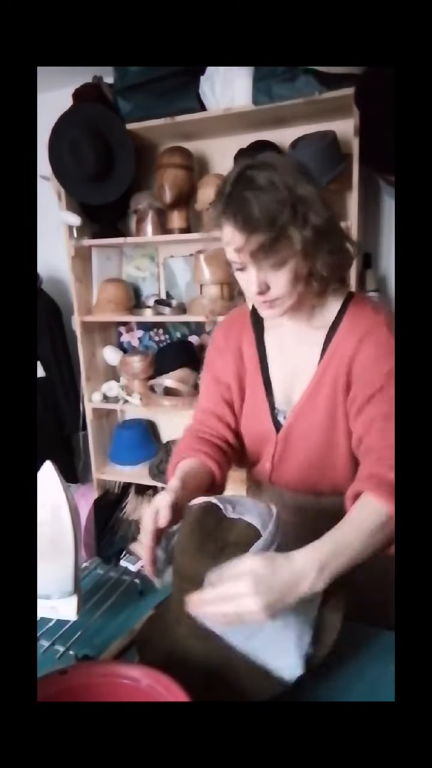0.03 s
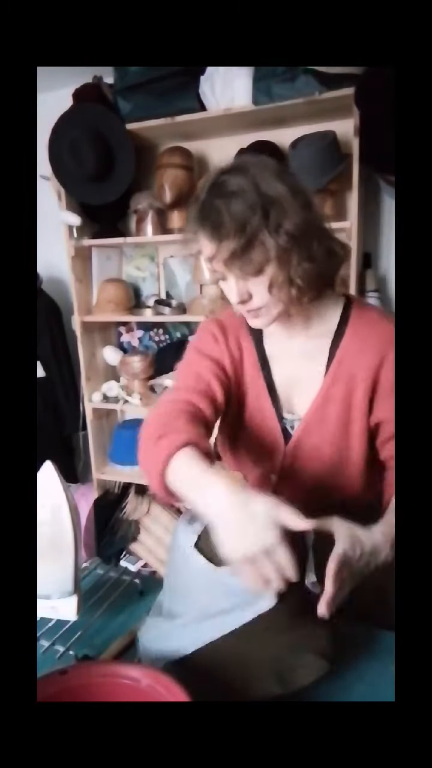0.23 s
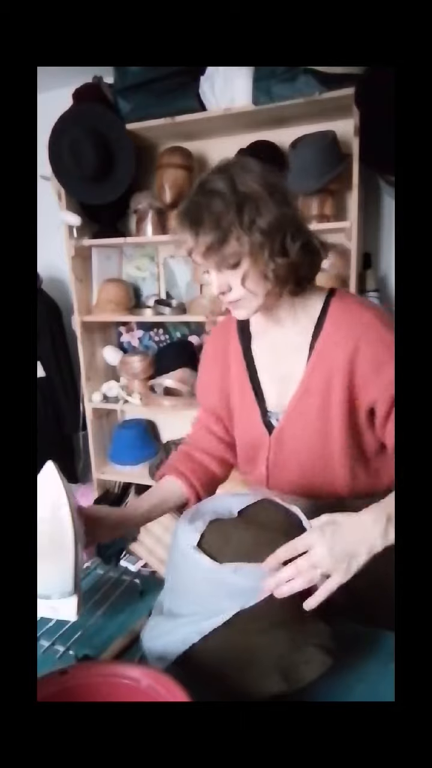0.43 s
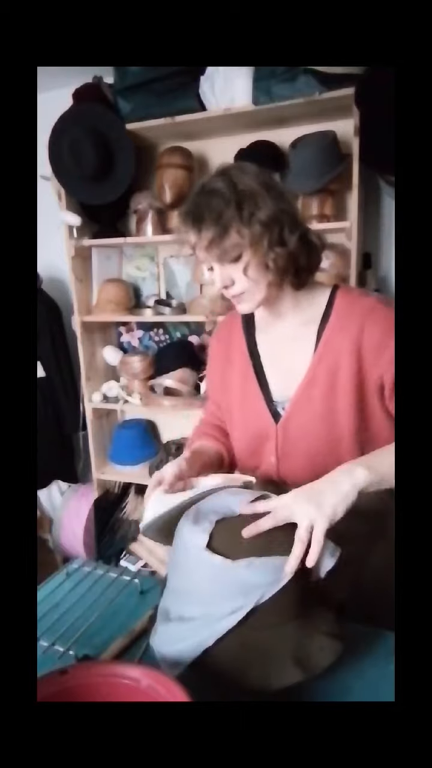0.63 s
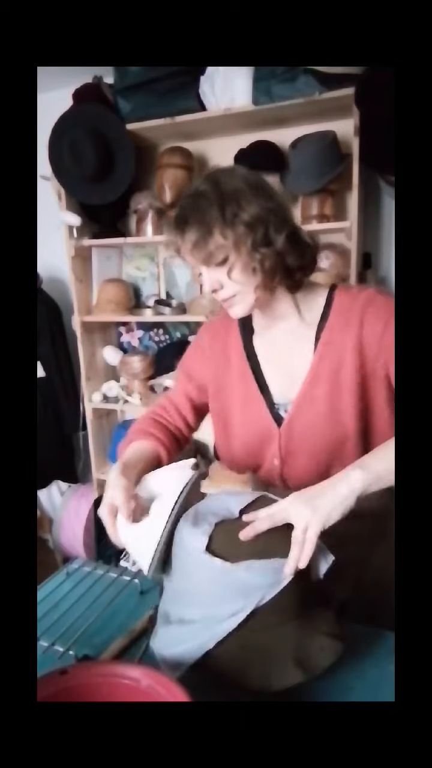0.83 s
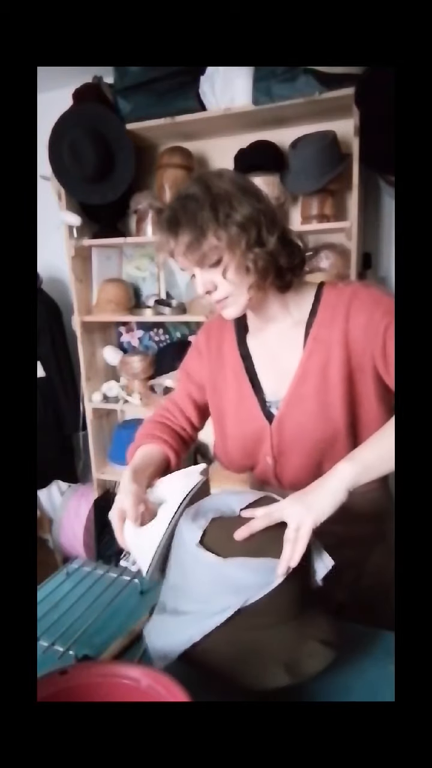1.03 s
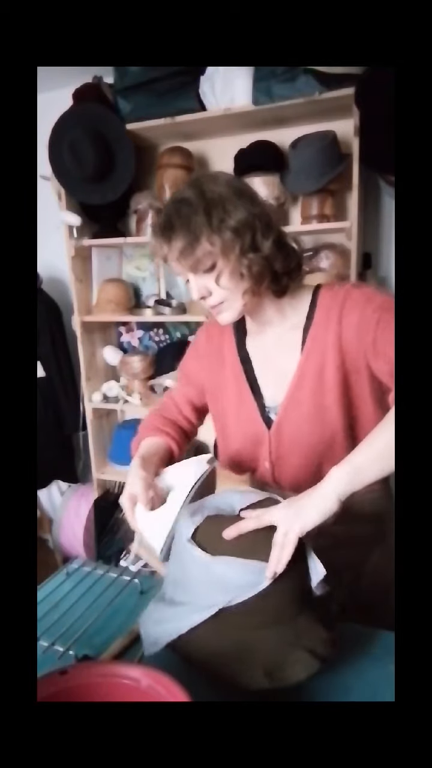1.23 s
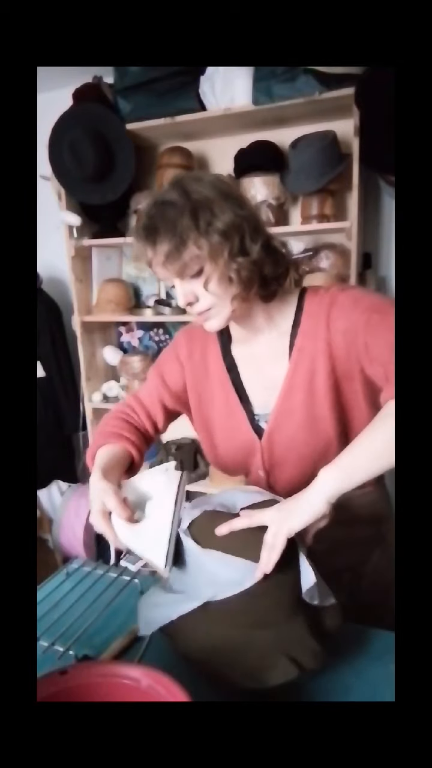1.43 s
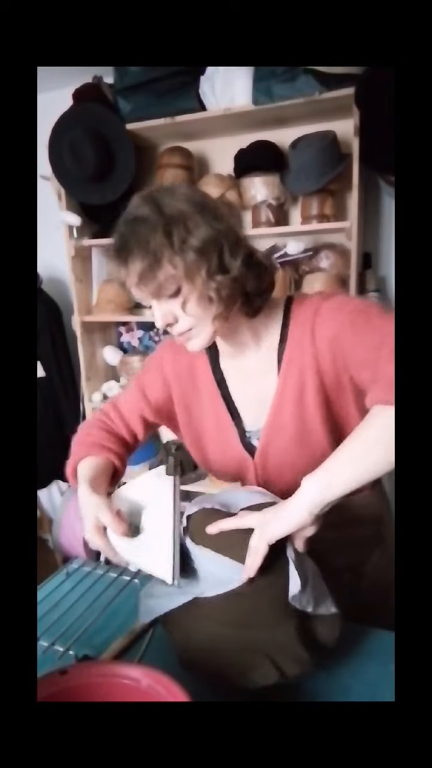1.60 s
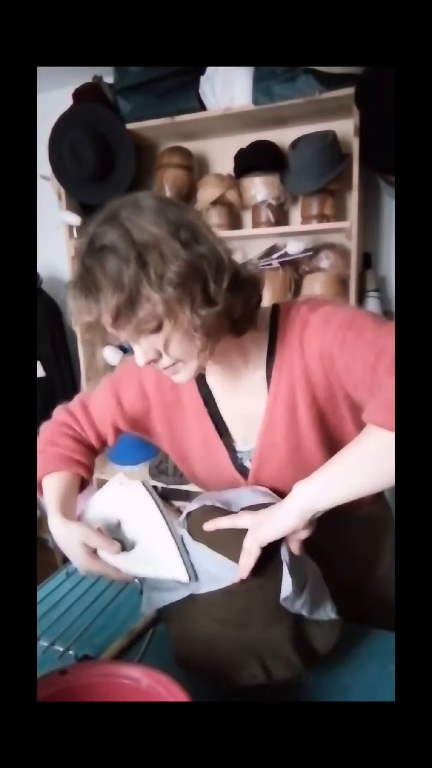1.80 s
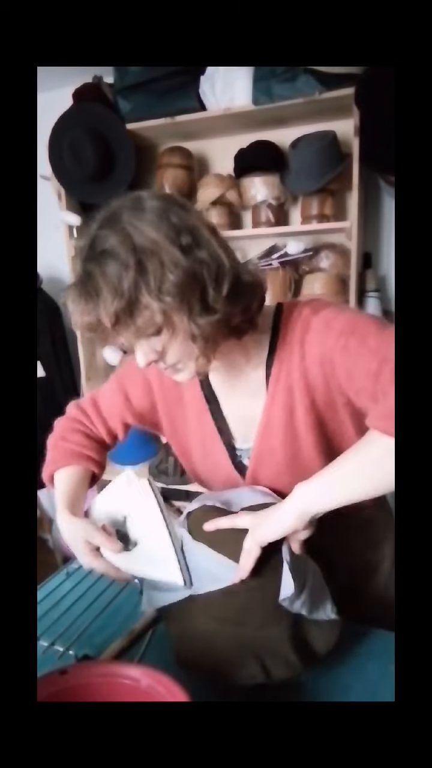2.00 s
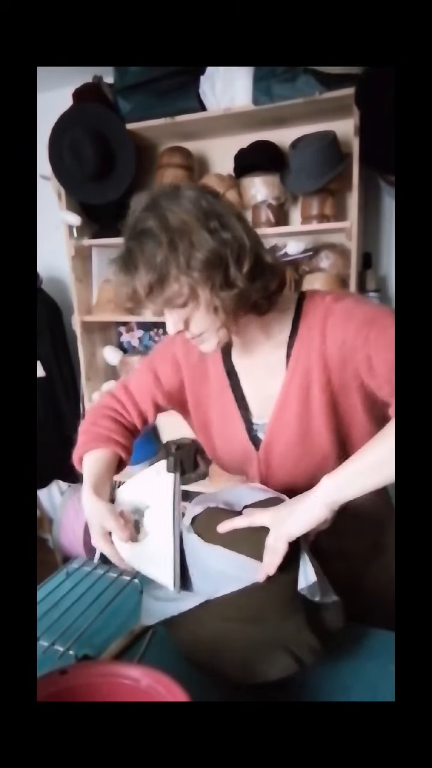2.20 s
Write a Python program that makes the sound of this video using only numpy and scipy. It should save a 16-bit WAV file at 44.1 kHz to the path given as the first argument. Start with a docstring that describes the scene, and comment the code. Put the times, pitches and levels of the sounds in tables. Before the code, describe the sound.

An iron's steam hiss follows a few cloth rustles and thumps on a hat block.

```python
"""Soft rubs and a dull knock: a hand smooths and pats a damp cloth over a felt hat on a wooden block.
The block rings briefly at each blow, and the workshop bench booms softly as weight shifts on it.
A hot iron is picked up and set on the cloth, and the water flashes to hissing steam.
The steam slowly thins while the iron's sole (its flat underside) slides to and fro and nudges the block."""
import sys
import numpy as np
from scipy import signal
from scipy.fft import rfft, irfft, next_fast_len
from scipy.io import wavfile
from scipy.ndimage import uniform_filter1d, map_coordinates

SR = 44100
rng = np.random.default_rng(int(sys.argv[2]) if len(sys.argv) > 2 else 0)


def to_wav(s):
    """Save 16-bit WAV."""
    ch = np.atleast_2d(s).T  # columns
    pcm = np.round(np.clip(ch, -1, 1) * 32767)  # PCM
    wavfile.write(sys.argv[1], SR, pcm.astype(np.int16))


N = 103635

# how alike left and right are for the steam and the iron (frequency [Hz], likeness [0-1])
STEAM_ALIKE = [(100, 0.4), (400, 0.85), (800, 0.45), (1400, 0.3), (2500, 0.26), (4500, 0.19), (8000, 0.11),
               (15000, 0.07)]
# the same for the handling and the room (frequency [Hz], likeness [0-1])
CLOTH_ALIKE = [(100, 0.93), (400, 0.69), (1000, 0.26), (2500, 0.071), (8000, 0.085)]


def amp(db):
    """Turn decibels into a gain."""
    return 10 ** (np.asarray(db) / 20)


def unit(x):
    """Scale a signal to an average power of 1."""
    return x / np.sqrt(np.mean(x ** 2) + 1e-20)


def along(points, hz):
    """Read between (frequency, value) points on a logarithmic frequency axis."""
    point_hz, values = np.transpose(points)
    return np.interp(np.log(hz + 1), np.log(point_hz + 1), values)


def since(start):
    """Seconds since the start for every sample, zero before it."""
    return np.maximum(np.arange(N) / SR - start, 0)


def struck(t, db, rise_s, fade_s):
    """The gain after a blow: it rises quickly and drops 60 dB in each fade time."""
    return amp(db - 60 * t / fade_s) * (1 - np.exp(-t / rise_s))


def level(rows, fade_s=0.057):
    """Gain for every sample from (time, level) rows, fading quickly to silence outside them."""
    times, db = np.transpose(rows)
    t = np.arange(N) / SR
    outside_s = np.maximum(np.maximum(times[0] - t, t - times[-1]), 0)
    return amp(np.interp(t, times, db) - 60 * outside_s / fade_s)


def wobble(per_s):
    """A smooth curve through per_s random points a second."""
    points = rng.standard_normal(int(N * per_s / SR) + 4)
    return map_coordinates(points, [np.arange(N) * per_s / SR])


def filtered(x, response):
    """Give each frequency in x the gain response(hz)."""
    size = next_fast_len(N + SR // 2)
    hz = np.fft.rfftfreq(size, 1 / SR)
    return irfft(rfft(x, size) * response(hz), size)[..., :N]


def spread(pair, colour, alike):
    """Blend two unrelated signals into stereo with a given tone colour and left-right likeness."""
    def response(hz):
        angle = np.arccos(np.clip(along(alike, hz), 0, 1)) / 2
        return amp(along(colour, hz)) * [np.cos(angle), np.sin(angle)]
    mid, side = filtered(pair, response)
    return np.array([mid + side, mid - side]) / mid.std()


def rush(colour, alike, patchy_db):
    """Churning stereo noise with louder and softer patches across pitch and time."""
    spectrum = signal.stft(rng.standard_normal((2, N)), nperseg=512)[2]
    patches = uniform_filter1d(rng.standard_normal(spectrum.shape[1:]), size=6, axis=0)
    patches = uniform_filter1d(patches, size=10, axis=1)
    noise = signal.istft(spectrum * amp(patchy_db * np.tanh(unit(patches))), nperseg=512)[1]
    return spread(noise[:, :N], colour, alike)


def grains(colour, alike, per_s, spread_db):
    """Tiny snaps of uneven size at random moments."""
    happens = rng.random(N) < per_s / SR
    sizes = amp(spread_db * np.minimum(rng.exponential(size=N), 4))
    return spread(happens * sizes * rng.standard_normal((2, N)), colour, alike)


def narrow(hz, width_hz):
    """A band of noise around one pitch, which may move."""
    phase = 2 * np.pi * np.cumsum(hz * np.ones(N)) / SR
    return unit(wobble(width_hz) * np.cos(phase) + wobble(width_hz) * np.sin(phase))


def room_air():
    """The faint, steady hush of the workshop."""
    # tone of the hush (frequency [Hz], relative level [dB])
    colour = [(25, 1.5), (60, -6.5), (140, -5.5), (300, -10.5), (450, -18), (700, -14.5), (1020, -9.5),
              (1400, -19.5), (3000, -21.5), (4000, -29), (5000, -25), (6500, -21), (9000, -30.5),
              (15000, -28.5)]
    return amp(-67.5) * spread(rng.standard_normal((2, N)), colour, CLOTH_ALIKE)


def hat_drag():
    """The hat and its block rumble softly as each push drags them."""
    # pushes (middle time [s], half length [s], level [dB])
    pushes = [(0.034, 0.085, -65), (0.198, 0.017, -53), (0.554, 0.019, -57), (0.681, 0.024, -57),
              (1.084, 0.037, -70), (1.394, 0.012, -59.5), (1.545, 0.023, -54), (1.827, 0.082, -64),
              (1.98, 0.033, -58.5), (2.06, 0.039, -60.5), (2.157, 0.041, -57), (2.291, 0.045, -61.5)]
    # tone of the rumble (frequency [Hz], relative level [dB])
    colour = [(25, 4.5), (70, 6.5), (140, 8.5), (250, -3), (400, -9.5), (700, -12.5), (1500, -50)]
    t = np.arange(N) / SR
    effort = sum(amp(db) * np.exp(-((t - middle) / half) ** 2) for middle, half, db in pushes)
    return effort * rush(colour, CLOTH_ALIKE, patchy_db=0.5)


def cloth_strokes():
    """Each stroke of hand or iron drags fibres over the felt: a dull grainy rub and a bright swish."""
    # strokes (peak time [s], rise [s], hold [s], fall [s], rub level [dB], swish level [dB])
    strokes = [(0.072, 0.016, 0.0051, 0.035, -60.5, -76), (0.121, 0.069, 0.022, 0.033, -69.5, -70.5),
               (0.152, 0.0088, 0.0037, 0.011, -65, -59.5), (0.177, .01, 0.012, .025, -72, -67),
               (0.244, 0.038, 0.036, 0.036, -45, -79), (0.292, 0.062, 0.023, 0.022, -52.5, -61),
               (0.332, 0.015, 0.0093, 0.024, -84, -62), (0.403, 0.023, 0.0056, 0.0091, -82, -59.5),
               (0.54, 0.004, 0.00315, 0.012, -56.5, -72.5), (0.566, 0.016, 0.023, 0.077, -64, -93),
               (0.601, 0.017, 0.0028, 0.025, -54.5, -60), (0.618, 0.015, 0.008, 0.028, -51, -67.5),
               (0.65, 0.015, 0.011, 0.022, -49.5, -72), (0.673, 0.008, 0.005, 0.015, -55.5, -82),
               (0.714, .003, .003, 0.13, -71, -85), (1.073, 0.045, 0.025, 0.068, -58, -72),
               (1.176, 0.04, 0.0086, 0.042, -63, -79)]
    # tone of the rub (frequency [Hz], relative level [dB])
    rub_colour = [(40, -10), (150, -2.5), (300, 1), (550, 1), (900, 2), (1300, -5.5), (2000, -10),
                  (3000, -15.5), (4000, -26), (7000, -44), (14000, -62)]
    # tone of the swish (frequency [Hz], relative level [dB])
    swish_colour = [(300, 2.5), (1300, -10), (2500, -1.5), (3300, -3.5), (4000, -12), (5200, 2),
                    (6500, 0.5), (7800, -0.5), (9000, -12), (15000, -23)]
    t = np.arange(N) / SR
    rub_power, swish_power = np.zeros(N), np.zeros(N)
    for peak, rise, hold, fall, rub_db, swish_db in strokes:
        swell = np.exp(-4 * (np.maximum(peak - t, 0) / rise) ** 1.07)
        fade = np.exp(-4 * (since(peak + hold) / fall) ** 1.66)
        rub_power += swell * fade * amp(rub_db) ** 2
        swish_power += swell * fade * amp(swish_db) ** 2
    rub = np.sqrt(rub_power) * grains(rub_colour, CLOTH_ALIKE, per_s=7000, spread_db=0.5)
    swish = np.sqrt(swish_power) * grains(swish_colour, CLOTH_ALIKE, per_s=12000, spread_db=1.0)
    return rub + swish


def ticks():
    """Small hard contacts, cushioned by cloth, ring briefly as the hands move and grip the iron."""
    # contacts (time [s], level [dB], pitch [Hz], band width [Hz], fade time [s])
    contacts = [(0.1548, -46, 1504, 949, 0.026), (0.603, -45.5, 950, 898, 0.05),
                (0.6044, -43.5, 2280, 1500, 0.051), (0.605, -49, 5250, 698, 0.03),
                (0.651, -37, 618, 650, 0.015), (0.660, -39.5, 577, 650, 0.015),
                (0.7133, -50.5, 1040, 700, 0.015)]
    out = np.zeros((2, N))
    for start, db, hz, width_hz, fade_s in contacts:
        shared = narrow(hz, width_hz)
        each_side = np.array([narrow(hz, width_hz) for _ in range(2)])
        out += struck(since(start), db, rise_s=0.00079, fade_s=fade_s) * unit(shared + 0.5 * each_side)
    return out


def block_knocks():
    """Hand and iron knock the felt-covered block: it rings, and air puffs out of the squeezed felt."""
    # soft blows (time [s], level [dB], pitch [ratio], brightness [dB per octave])
    knocks = [(0.174, -40.5, 2.24, -22), (0.18, -45, 0.8, -24), (0.2015, -20.5, 0.99, 1),
              (0.57, -50, 0.91, -18), (0.783, -42, 1.45, -11), (0.816, -52, 1.9, -26),
              (0.835, -33, 1.07, -10.5), (0.845, -35.5, 1, -3.5), (1.527, -54, 0.96, -13),
              (1.703, -47.5, 0.98, -14), (1.785, -48.5, 1.1, -12), (1.852, -47, 0.9, -2.5),
              (1.867, -51.5, 1.97, -10), (2.141, -53.5, 0.81, 0.5)]
    # the block's own tones (frequency [Hz], relative level [dB], fade time [s], rise [s])
    tones = [(80, -19, 0.093, 0.0031), (139.3, 3.5, 0.055, 0.003), (211, -2, 0.046, 0.0036),
             (436.9, 4.5, 0.026, 0.0041), (485, -11, 0.042, 0.0039), (945, -11, 0.02, 0.00086),
             (1390, -32, 0.011, 0.00104)]
    # tone of the puff (frequency [Hz], relative level [dB])
    puff_colour = [(25, -2.5), (150, 2), (450, -2), (750, -10), (1000, -14.5), (1500, -21), (3000, -71)]
    sharp_by, sag_s = 0.16, 0.0016  # the pitch starts high and sags as the contact spreads
    bright_above_hz = tones[1][0]
    ring, puff = np.zeros(N), np.zeros(N)
    for start, db, pitch, bright_db in knocks:
        t = since(start)
        phase_per_hz = 2 * np.pi * pitch * (t + sharp_by * sag_s * (1 - np.exp(-t / sag_s)))
        for hz, tone_db, fade_s, rise_s in tones:
            tilt_db = bright_db * max(np.log2(hz / bright_above_hz), 0)
            ring += struck(t, db + tone_db + tilt_db, rise_s, fade_s) * np.sin(hz * phase_per_hz)
        puff += struck(t, db - 15, rise_s=0.00045, fade_s=0.098)
    return ring + puff * rush(puff_colour, CLOTH_ALIKE, patchy_db=3.0)


def bench_booms():
    """The bench sways as weight shifts on it: short low booms, each at a slightly different pitch."""
    # sways (time [s], level [dB], fade time [s])
    sways = [(0.26, -47, 0.1), (0.42, -51.5, 0.36), (0.67, -49, 0.15), (0.837, -50, 0.25),
             (1.068, -48, 0.094), (1.809, -51, 0.37), (1.954, -46, 0.26), (2.071, -55, 0.22),
             (2.14, -50.5, 0.29)]
    pitches_hz = 61.1 * rng.normal(1, 0.1, len(sways))
    boom = np.zeros(N)
    for (start, db, fade_s), hz in zip(sways, pitches_hz):
        t = since(start)
        boom += struck(t, db, rise_s=0.006, fade_s=fade_s) * np.sin(2 * np.pi * hz * t)
    return boom


def steam_hiss():
    """Steam escapes from under the sole, spitting with tiny bursts of boiling water."""
    # loudness of the hiss, in stretches (time [s], relative level [dB])
    loudness = [
        [(0.77, -102), (0.8, -53), (0.884, -40.5), (0.92, -43), (0.932, -35.5), (0.956, -40.5), (0.97, -44.5),
         (1.02, -41)],
        [(1.02, -40.5), (1.09, -40), (1.15, -47.5), (1.184, -44.5), (1.286, -51.5), (1.34, -54)],
        [(1.338, -51), (1.355, -46.5), (1.378, -48), (1.40, -50), (1.435, -47), (1.578, -50.5), (1.638, -55.5),
         (1.748, -47.5), (1.794, -57), (1.866, -54.5), (1.894, -47.5), (1.94, -59.5)],
        [(1.94, -59.5), (1.994, -49), (2.014, -46.5), (2.034, -55.5), (2.086, -47), (2.126, -59),
         (2.192, -55.5), (2.24, -60), (2.302, -53.5), (2.35, -58.5)],
    ]
    # tone of the hiss (frequency [Hz], relative level [dB])
    colour = [(1500, -29.5), (3900, -13), (4450, -11), (5100, -1.5), (6000, 0), (7300, 0.5), (8000, -1),
              (9000, -11), (10000, -12.5), (11000, -23), (15000, -17)]
    jet = rush(colour, STEAM_ALIKE, patchy_db=2.2)
    spit = amp(-15) * grains(colour, STEAM_ALIKE, per_s=2900, spread_db=3)
    return amp(-1.14) * level(np.vstack(loudness)) * (jet + spit)


def steam_fizz():
    """Steam rises from the wet cloth with a fine, smooth fizz."""
    # loudness of the fizz, in stretches (time [s], relative level [dB])
    loudness = [
        [(0.774, -100), (0.802, -74), (0.852, -55.5), (0.888, -51.5), (0.97, -57), (1.108, -58.5), (1.126, -61),
         (1.24, -55.5), (1.272, -58), (1.35, -60)],
        [(1.35, -54), (1.384, -64), (1.428, -56.5), (1.444, -63), (1.566, -60), (1.58, -57), (1.698, -63.5),
         (1.774, -59), (1.856, -65.5), (1.898, -58.5), (1.94, -64)],
        [(1.94, -57), (1.948, -68), (1.97, -60), (2.028, -70.5), (2.08, -64), (2.126, -76), (2.182, -65),
         (2.208, -58.5), (2.282, -66.5), (2.292, -59.5), (2.35, -69)],
    ]
    # tone of the fizz (frequency [Hz], relative level [dB])
    colour = [(300, -20), (1300, -6), (3000, -7), (4000, -8.5), (5500, -15.5), (9800, 2), (11000, -1),
              (13500, 2.5), (14700, 3.5), (15800, -1)]
    fizz = spread(rng.standard_normal((2, N)), colour, STEAM_ALIKE)
    return amp(4.5) * level(np.vstack(loudness)) * fizz


def steam_gush():
    """The first steam, trapped under the sole, gushes hollowly and fades as the slide begins."""
    # loudness of the gush (time [s], level [dB])
    loudness = [(0.81, -79), (0.838, -54.5), (0.93, -49.5), (0.96, -54), (1.03, -47), (1.072, -45),
                (1.13, -52), (1.144, -56), (1.172, -52.5), (1.275, -60), (1.305, -54), (1.36, -66.5),
                (1.39, -62.5)]
    # tone of the gush (frequency [Hz], relative level [dB])
    colour = [(80, -35), (300, -24.5), (500, -12), (750, -16), (1100, -5), (1450, 1.5), (2100, -5),
              (2800, -4.5), (3300, -6), (3900, -26), (5000, -22), (9000, -37.5)]
    return level(loudness) * rush(colour, STEAM_ALIKE, patchy_db=5)


def sole_slide():
    """The sole scrapes along the cloth and catches on the weave."""
    # loudness of the slide, in stretches (time [s], relative level [dB])
    loudness = [
        [(1.39, -64.5), (1.51, -52.5), (1.57, -64), (1.64, -56.5), (1.70, -62), (1.722, -52.5), (1.755, -52.5),
         (1.844, -64), (1.886, -53.5), (1.938, -60.5)],
        [(1.94, -62), (1.976, -57), (1.996, -48), (2.016, -51), (2.046, -60), (2.086, -50.5), (2.118, -64.5),
         (2.168, -63), (2.212, -66.5), (2.314, -57), (2.35, -58)],
    ]
    # tone of the slide (frequency [Hz], relative level [dB])
    colour = [(80, -11.5), (250, -13), (550, -5), (800, -7.5), (1100, 0), (1450, 1.5), (2100, -1.5),
              (2650, 0), (3300, -3.5), (3900, -9), (5000, -12), (9000, -29)]
    scrape = rush(colour, STEAM_ALIKE, patchy_db=6)
    catches = amp(-7) * grains(colour, STEAM_ALIKE, per_s=1400, spread_db=1.0)
    return amp(-2.0) * level(np.vstack(loudness)) * (scrape + catches)


def sole_over_edge():
    """The sole runs off an edge once, and its scrape falls in pitch."""
    # the falling scrape (time [s], pitch [Hz], level [dB])
    glide = [(1.39, 3307, -64.5), (1.44, 2824, -54.5), (1.48, 2210, -56.5), (1.515, 1542, -60),
             (1.541, 814, -59), (1.57, 610, -82)]
    times, hz, db = np.transpose(glide)
    t = np.arange(N) / SR
    scrape = np.array([narrow(np.interp(t, times, hz), width_hz=1150) for _ in range(2)])
    return amp(np.interp(t, times, db, left=-120, right=-120)) * scrape


def wall_echoes(x):
    """The crowded workshop answers with a short wash of echoes whose treble dies first."""
    # how long the echoes last (frequency [Hz], time to drop 60 dB [s])
    fade_times = [(100, 0.57), (1000, 0.4), (10000, 0.172)]
    hz, t, spectrum = signal.stft(rng.standard_normal((2, SR // 3)), SR, nperseg=256)
    fade = amp(-60 * t / along(fade_times, hz)[:, None])
    tail = signal.istft(spectrum * fade, SR, nperseg=256)[1]
    return signal.fftconvolve(x, tail / np.linalg.norm(tail[0]), axes=1)[:, :N]


def with_near_echo(x):
    """Mix in one echo from a nearby surface; its delay wanders as the iron moves."""
    delay_s, drift_s, gain = 0.00355, 0.00013, amp(-16.5)
    echo = np.zeros_like(x)
    for side in range(2):
        lag = SR * (delay_s + drift_s * wobble(per_s=2))
        echo[side] = map_coordinates(x[side], [np.arange(N) - lag])
    return (x - gain * echo) / np.sqrt(1 + gain ** 2)


def scene():
    """The quiet room, the handling with its wall echoes, and the ironing with its near echo."""
    handling = hat_drag() + cloth_strokes() + ticks() + block_knocks() + bench_booms()
    ironing = steam_hiss() + steam_fizz() + steam_gush() + sole_slide() + sole_over_edge()
    return room_air() + handling + amp(-29.5) * wall_echoes(handling) + with_near_echo(ironing)


def record(dry):
    """Left and right differ in colour; the sound is slightly softer near 4 kHz and has no top treble."""
    # each microphone opening has its own treble resonance (frequency [Hz], left minus right [dB])
    balance = [(60, -4.5), (130, -5), (250, -1.5), (700, -1.5), (1100, -3.5), (1600, -4), (2600, -6.5),
               (3400, -1), (4200, 0), (5200, -5.5), (6200, -7), (6700, -1.5), (7200, 6), (7800, 12.5),
               (8600, 6.5), (9300, 2.5), (12000, 1.5), (14500, -2)]
    soft_hz, soft_width_hz, soft_db = 4050, 470, -1.5
    top_hz = 15780
    def tone(hz):
        gains = amp(np.outer([0.5, -0.5], along(balance, hz)))
        softening = amp(soft_db * np.exp(-((hz - soft_hz) / soft_width_hz) ** 2))
        return softening * gains / np.sqrt(np.mean(gains ** 2, axis=0))
    coloured = filtered(dry, tone)
    return filtered(coloured, lambda hz: hz < top_hz)


dry = scene()
out = record(dry)
to_wav(out)
```